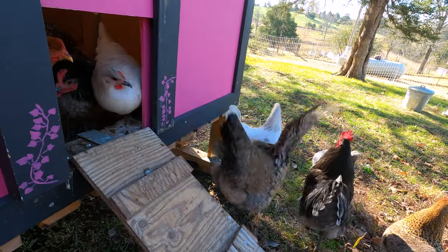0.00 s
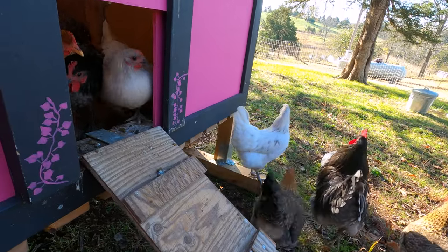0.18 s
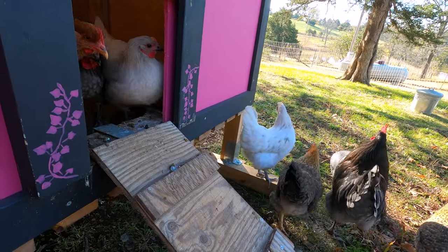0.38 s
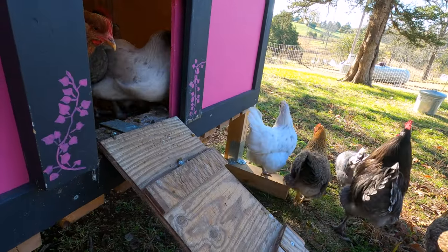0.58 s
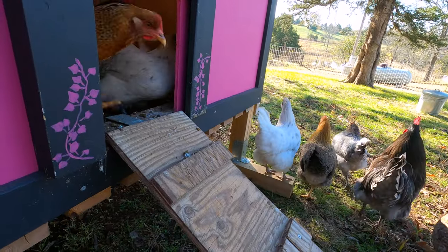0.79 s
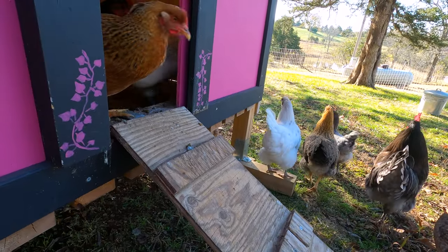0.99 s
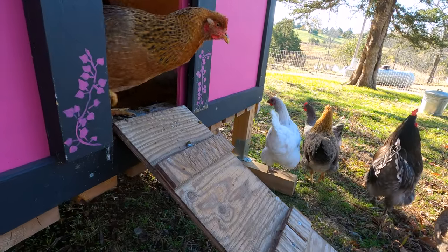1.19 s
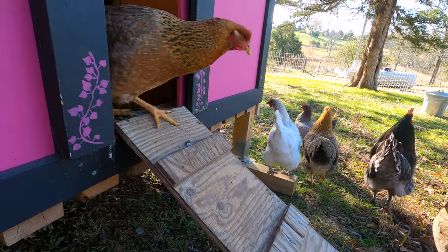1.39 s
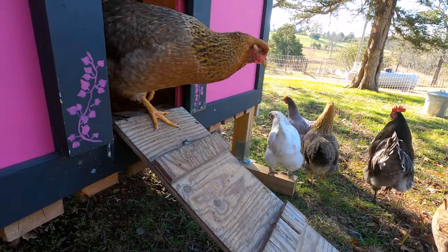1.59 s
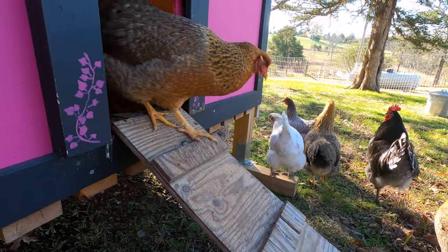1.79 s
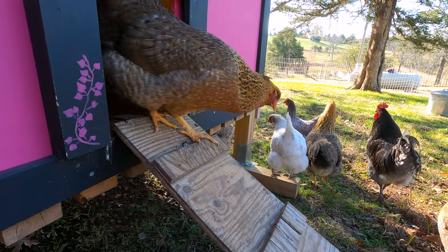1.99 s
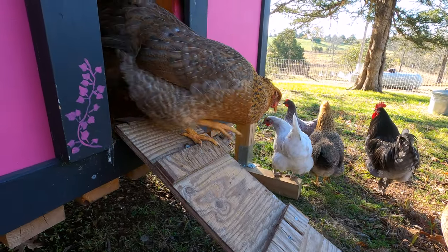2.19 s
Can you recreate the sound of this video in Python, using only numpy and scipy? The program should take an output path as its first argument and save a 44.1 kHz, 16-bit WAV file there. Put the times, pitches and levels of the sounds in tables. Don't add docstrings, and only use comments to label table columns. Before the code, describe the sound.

Chicken footsteps bump and scrape on hollow boards, with quiet clucks, ticking claws and rustling dry leaves

```python
import sys
import numpy as np
from scipy import signal
from scipy.fft import rfft, irfft
from scipy.io import wavfile
from scipy.ndimage import uniform_filter1d

SR = 44100
rng = np.random.default_rng(int(sys.argv[2]) if len(sys.argv) > 2 else 0)


def magnitude_from_level(level_db):
    exponent = np.asarray(level_db, float) / 20
    return 10 ** exponent


def file_out(sig):
    cols = np.atleast_2d(sig).T
    lim = np.clip(cols, -1, 1)
    pcm = np.round(lim * 32767).astype(np.int16)
    wavfile.write(sys.argv[1], SR, pcm)


N = 97020

# t/s, length/s, level/dB, pitch f/Hz, throat width/octaves
CLUCK_NOTES = [
    (0.203, 0.057, -38.5, 255.3, 0.68),
    (0.385, 0.025, -39, 286, 0.61),
    (0.4, 0.033, -49.5, 253, 0.24),
    (1.331, 0.011, -46, 235, 0.13),
    (1.347, 0.0155, -36.5, 242, 0.34),
    (1.581, 0.013, -51, 263, 0.14),
    (1.594, 0.014, -38, 198, 0.27),
]
# resonance f/Hz, share of pitch lost from start to end
CLUCK_THROATS = [(700, 0.067), (683, -0.032), (765, -0.052), (765, .045), (760, 0.052), (765, .045),
                 (757, 0.05)]


def clucks():
    attack_share, jitter, breathiness, pan_db = .25, .017, .13, -4.5
    out = np.zeros((2, N))
    for (s, length, db, hz, width), (throat, sag) in zip(CLUCK_NOTES, CLUCK_THROATS):
        u = np.arange(int(length * SR)) / (length * SR)
        wobble = uniform_filter1d(rng.standard_normal(4096), size=150)[:len(u)] * 12
        pitch = hz * (1 + sag * (.5 - u) + jitter * wobble)
        phase = 2 * np.pi * np.cumsum(pitch) / SR
        note = 0
        for k in range(1, 9):
            resonance_db = -6 * (np.log2(k * hz / throat) / width) ** 2
            note = note + magnitude_from_level(resonance_db) * np.sin(k * phase - 0.476 * k * k)
        note = rms_one(note) * (1 + breathiness * wobble)
        nearest_end = np.minimum(u, 1 - u)
        shape = np.sin(np.pi / 2 * np.clip(nearest_end / attack_share, 0, 1)) ** 2
        i = int(s * SR)
        out[:, i:i + len(u)] += panned(magnitude_from_level(db) * note * shape, pan_db)
    return out


# t/s, boom level/dB, boom centre f/Hz, litter drag level/dB
WEIGHT = [(0, -38.5, 108, -52), (.1, -51.5, 88, -70.5), (.23, -41.5, 111, -59), (.34, -51.5, 90, -68.5),
          (.41, -49, 135, -57.5), (.52, -39, 148, -52), (.57, -40, 131, -54.5), (.7, -36.5, 103, -44),
          (.84, -34, 80, -42), (.93, -24, 115, -41.5), (1.02, -30, 101, -57), (1.14, -32, 100, -45.5),
          (1.25, -31.5, 98.4, -53.5), (1.3, -35, 80, -56.5), (1.45, -33.5, 79, -62.5),
          (1.6, -38.5, 80, -65), (1.81, -46.5, 80, -69.5), (2.2, -45, 78.5, -66.5)]
# t/s, level/dB
FRAME_SWAY = [
    (0, -81),
    (.5, -47),
    (.7, -37.5),
    (.89, -30.5),
    (.97, -38),
    (1.4, -66),
    (1.6, -52),
    (2.2, -59),
]
CAVITY_MODES = [59.8, 80, 98.4, 125.7, 164.4, 202.1, 256.7]
# f/Hz, level per Hz/dB
DRAG_SPECTRUM = [(280, 9), (600, 4), (1300, -0.5), (2300, -31.5)]


def coop_floor():
    fall_db, q, top_hz = 8, 22, 313
    boom_db, centre, drag_db = in_time(WEIGHT)
    sway_db, = in_time(FRAME_SWAY)
    shares, modes = [], []
    for hz in CAVITY_MODES:
        shares.append(magnitude_from_level(-fall_db * np.abs(np.log2(hz / centre))))
        sharp = ring(rng.standard_normal(N), hz, q / hz)
        modes.append(evened(ring(sharp, hz, 5.0 / hz)))
    total_share = np.sqrt(np.sum(np.square(shares), axis=0))
    boom = evened(np.sum(np.multiply(shares, modes), axis=0) / total_share)
    side = magnitude_from_level(-23.5) * rms_one(ring(rng.standard_normal(N), 155, 0.0087)) * [[1], [-1]]
    low_pass = signal.butter(4, top_hz, fs=SR, output="sos")
    low = signal.sosfilt(low_pass, panned(boom, 1.27) + side)
    sway_band = signal.butter(2, [22, 45], "band", fs=SR, output="sos")
    sway = evened(signal.sosfilt(sway_band, rng.standard_normal(N)))
    drag = rms_one(banded(rng.standard_normal((2, 2, N)), DRAG_SPECTRUM, lambda hz: magnitude_from_level(1.2 * drift(14))))
    return magnitude_from_level(boom_db) * low + panned(magnitude_from_level(sway_db) * sway, 0.87) + magnitude_from_level(drag_db) * drag


FOOTFALL_TIMES = [.4, .49, .586, .679, .765, .855, .879, .895, 1.11, 1.345, 1.45, 1.765, 1.893]
# level/dB, pitch of the spot f/Hz
FOOTFALLS = [(-27.5, 138), (-51, 150), (-22, 390), (-22, 187), (-25.5, 157), (-25.5, 250), (-21, 140),
             (-32, 310), (-40, 400), (-32, 280), (-40.5, 330), (-45.5, 310), (-40.5, 227)]
# f/Hz, level/dB
BOARD_MODES = [(105, 2), (165, -0.5), (248, 0), (305, -11), (470, -6), (595, 1.5), (1085, 14), (1450, -17)]


def thuds():
    t60_s, loss_power, spot_fall_db = 0.097, 0.23, 15.5
    out, t = np.zeros(N), np.arange(N) / SR
    level_db, spot = np.transpose(FOOTFALLS)
    chance_db = rng.normal(0, 0.5, (len(FOOTFALLS), len(BOARD_MODES)))
    pushes = []
    for s, hz in zip(FOOTFALL_TIMES, spot):
        contact = np.clip((t - s) * hz / 0.42, 0, 1)
        pushes.append(np.sin(np.pi * contact) ** 2 * hz / SR * 5)
    pushes = np.array(pushes)
    for k, (hz, db) in enumerate(BOARD_MODES):
        off_spot_db = spot_fall_db * np.abs(np.log2(hz / spot))
        strength = magnitude_from_level(level_db + chance_db[:, k] + db - off_spot_db)
        out += ring(strength @ pushes, hz, t60_s * (500 / hz) ** loss_power)
    return panned(out, 1.7)


# f/Hz, level per Hz/dB
SCUFF_SPECTRUM = [(250, 6.5), (1100, 2.5), (2100, -0.5), (4100, -2.5), (9500, -24), (15500, -36)]
# t/s, rise/s, fall t60/s, level/dB, tilt/dB per octave
FOOT_SCUFFS = [(0.58, 0.0082, 0.13, -26.5, -0.5), (0.645, 0.012, 0.27, -32.5, 1),
               (0.668, 0.013, 0.071, -40.5, 8), (0.85, 0.005, 0.46, -35, -4),
               (0.9, 0.011, 0.054, -33, -1.5), (0.16, 0.041, 0.16, -48.5, 8.5),
               (0.37, 0.0072, 0.096, -41.5, 2.5), (1.443, 0.0078, 0.064, -45, 3),
               (1.616, .02, 0.27, -51.5, -2), (2.133, 0.0026, 0.17, -55.5, 1.5),
               (1.029, 0.013, 0.056, -46, 1.5), (1.149, 0.006, 0.024, -43, 0),
               (1.328, 0.0061, 0.11, -45.5, 1), (1.1, .03, .25, -47, -3), (.53, .004, 0.056, -45.5, -0.5),
               (.868, 0.011, .1, -47, 1.5)]


def scuffs():
    t = np.arange(N) / SR
    shapes = []
    for s, rise, t60, db, _ in FOOT_SCUFFS:
        swell = np.clip((t - s) / rise, 0, 1)
        decay = magnitude_from_level(-60 * np.clip(t - s - rise, 0, 2) / t60)
        shapes.append(magnitude_from_level(db) * swell * decay)
    tilts = np.array(FOOT_SCUFFS)[:, 4]

    def gain_at(hz):
        return magnitude_from_level(1.46 * drift(25)) * (magnitude_from_level(tilts * np.log2(hz / 2000)) @ shapes)

    source = grains(900)
    scale = np.std(banded(source[..., :SR // 4], SCUFF_SPECTRUM, lambda hz: 1))
    return banded(source, SCUFF_SPECTRUM, gain_at) / scale


# t/s, peak level/dB, ring f/Hz, tilt/dB per octave
CLAW_TICKS = [(.192, -30, 4500, 2.5), (0.309, -41, 7400, 12), (0.436, -44, 7200, 13),
              (0.475, -33, 7250, 7.5), (.533, -37, 2500, -6), (0.956, -31.5, 6120, 0.5),
              (1.218, -36.5, 4120, 5), (1.45, -34.5, 1980, -2), (1.458, -35, 2750, 0.5),
              (1.467, -46, 7100, 1), (1.518, -36, 1820, 1.5), (1.547, -42.5, 2480, 4),
              (1.616, -37, 1680, -18.5), (1.631, -43, 4260, 16), (1.679, -32.5, 1480, -2.9),
              (1.701, -40, 3830, 0), (1.72, -37.5, 1670, -6), (1.762, -41, 1940, 0.5),
              (1.889, -28.5, 3400, -2), (1.905, -30, 2210, 2.5), (.649, -35, 3000, 1.5),
              (1.251, -47, 4160, 6), (2.152, -47, 4730, -5), (.915, -34, 1330, -12),
              (1.019, -48.5, 3700, 2), (1.095, -43.5, 1930, 0), (1.128, -52, 7000, 8),
              (1.232, -39.5, 2052, 2), (1.308, -48, 3600, 6), (1.382, -48, 3900, 9),
              (1.403, -46.5, 7100, 8), (1.426, -44.5, 3860, 7), (1.275, -50, 7000, 7),
              (1.416, -50, 2900, 6), (1.856, -58, 9000, 16), (2.136, -46, 1800, -4)]
TICK_SIDES = [-1, 7, -4, 6, 5, 8, 1, 4, 5.5, 1.5, 1, 0, 0, 1.5, 1, 0, 0, 4, 4, 1.2, 4, -1, 5, 1, 4.5, 5,
              1.5, 3, 1.2, -1.5, -7, -2, -1, 1.5, 1.5, 7]


def ticks():
    crack_t60_s, ring_t60_s, cut_hz = .021, .022, 1350
    lumps_db, hump_db, ring_db, tick_db = 3, 6, -1, -5.5
    out, t = np.zeros((2, N + SR)), np.arange(4096) / SR
    hz_axis = np.maximum(np.arange(2049) * SR / 4096, 1)
    colour = magnitude_from_level(at_hz(SCUFF_SPECTRUM, hz_axis)) / np.sqrt(1 + (cut_hz / hz_axis) ** 6)
    for (s, db, hz, tilt), pan_db in zip(CLAW_TICKS, TICK_SIDES):
        white = rng.standard_normal((2, 4096))
        smooth = uniform_filter1d(uniform_filter1d(rng.standard_normal(2049), size=40), size=40)
        hump = hump_db * np.exp(-(2 * np.log2(hz_axis / hz)) ** 2)
        uneven_db = lumps_db * rms_one(smooth) + hump + tilt * np.log2(hz_axis / 2000)
        noise = rms_one(irfft(rfft(white) * colour * magnitude_from_level(uneven_db)))
        crack = (noise[0] + 0.47 * noise[1] * [[1], [-1]]) * magnitude_from_level(-60 * t / crack_t60_s)
        tone_db = ring_db - 60 * t / ring_t60_s * np.sqrt(hz / 2000)
        tone = np.sin(2 * np.pi * hz * t) * magnitude_from_level(tone_db)
        i = int(s * SR)
        out[:, i:i + 4096] += magnitude_from_level(db + tick_db) * panned(crack + tone, pan_db) * np.minimum(t / 0.0002, 1)
    return out[:, :N]


# t/s, length/s, level/dB, f/Hz
RUBBED_RINGS = [(.96, .09, -28, 59.5), (1.015, 0.087, -26, 63), (1.08, 0.15, -28.5, 64),
                (1.2, 0.089, -28, 61.8), (.915, 0.072, -26.5, 98), (.865, 0.07, -28.5, 158),
                (1.33, 0.063, -38, 260), (1.89, 0.042, -46.5, 240), (.582, 0.015, -31, 234),
                (.583, 0.015, -32.5, 606), (.48, 0.074, -39.5, 170), (1.43, .08, -35.5, 84.6),
                (.332, .035, -60, 580), (.652, 0.051, -40, 1100), (.668, 0.024, -44, 4050),
                (.905, 0.026, -37, 1350), (.85, 0.026, -40.5, 1150), (.855, 0.057, -37.5, 480),
                (1.951, .016, -58, 1150), (2.133, 0.047, -61, 1800), (2.133, .028, -59.5, 4700),
                (.493, 0.022, -53, 1250), (1.612, .025, -56, 1650), (1.448, 0.015, -46, 2100),
                (1.44, 0.028, -53.5, 510), (1.755, 0.026, -58, 506)]


def rings():
    wander_share, rise_share = .025, .35
    out = np.zeros(N)
    for s, length, db, hz in RUBBED_RINGS:
        u = np.arange(int(length * SR)) / (length * SR)
        wander = rms_one(uniform_filter1d(rng.standard_normal(8192), size=int(3 * SR / hz)))[:len(u)]
        rise_and_fall = np.minimum(u / rise_share, (1 - u) / (1 - rise_share))
        shape = np.sin(np.pi / 2 * rise_and_fall) ** 1.5
        phase = 2 * np.pi * np.cumsum(hz * (1 + wander_share * wander)) / SR
        i = int(s * SR)
        out[i:i + len(u)] += magnitude_from_level(db + 5.5) * shape * np.sin(phase)
    return panned(out, 1.7)


# t/s, level/dB
LEAF_RUSTLE = [(0, -53), (.15, -50), (.3, -52.5), (.5, -51), (.75, -49), (.93, -49), (.99, -61.5),
               (1.12, -59), (1.25, -54.5), (1.4, -58.5), (1.6, -57.5), (1.85, -65.5), (2.05, -59.5),
               (2.2, -59.5)]
# f/Hz, level per Hz/dB
LEAF_SPECTRUM = [(300, -13), (780, -17), (1150, -2.5), (1700, -2.5), (4200, -4.5), (9600, -20),
                 (15500, -27.5)]


def leaves():
    db, = in_time(LEAF_RUSTLE)
    shared = drift(5.5)
    rustle = banded(grains(220), LEAF_SPECTRUM, lambda hz: magnitude_from_level(shared + 1.96 * drift(21.0)))
    return magnitude_from_level(db) * rms_one(rustle)


# delay t/s, level/dB
REFLECTIONS = [
    (.007, -23.5),
    (.013, -18.5),
]


def echoes(x):
    dull = signal.lfilter([.4], [1, -.6], x[::-1])
    out = 0
    for s, db in REFLECTIONS:
        out = out + magnitude_from_level(db) * np.pad(dull, ((0, 0), (int(s * SR), 0)))[:, :N]
    return out


def grains(per_s):
    sizes = magnitude_from_level(3.5 * np.minimum(rng.exponential(1, N), 2.5)) * (rng.random(N) < per_s / SR)
    crackle = signal.lfilter([1], [1, -.97], sizes)
    return rng.standard_normal((2, 2, N)) * (1 + magnitude_from_level(-8) * rms_one(crackle))


# f/Hz, correlation
CHANNEL_LIKENESS = [(60, 0.99), (240, 0.98), (950, 0.74), (2000, 0.45), (4500, 0.21), (15000, 0.054)]
# f/Hz, left-right level/dB
CHANNEL_LEAN = [(100, 3.5), (700, 1.5), (2000, 5.5), (4000, 2.5), (12000, -2.5)]


def banded(source, spectrum, gain_at):
    out, edges = 0, spectrum[0][0] * 2 ** np.arange(0, 6.1, .5)
    edges = edges[edges < 20000]
    for k, (low, high) in enumerate(zip(edges, edges[1:])):
        band = signal.butter(2, [low, high], "band", fs=SR, output="sos")
        mid, side = signal.sosfilt(band, source[k % 2])
        hz = np.sqrt(low * high)
        alike = np.clip(at_hz(CHANNEL_LIKENESS, hz), 0, 1)
        both = np.sqrt(1 + alike) * mid + np.sqrt(1 - alike) * side * [[1], [-1]]
        out = out + magnitude_from_level(at_hz(spectrum, hz)) * gain_at(hz) * panned(both, at_hz(CHANNEL_LEAN, hz))
    return out


def ring(x, hz, t60):
    r, w = magnitude_from_level(-60 / (t60 * SR)), 2 * np.pi * hz / SR
    return signal.lfilter([0, np.sin(w)], [1, -2 * r * np.cos(w), r * r], x + 1e-18)


def drift(rate):
    r = np.exp(-2 * np.pi * rate * 40 / SR)
    slow = signal.lfilter([1], [1, -2 * r, r * r], rng.standard_normal(N // 40 + 2002))[2000:]
    return np.interp(np.arange(N) / 40, np.arange(len(slow)), rms_one(slow))


def evened(x):
    x = rms_one(x)
    power = uniform_filter1d(x ** 2, size=int(.09 * SR))
    return x / (power + 0.008) ** (.6 / 2)


def panned(x, db):
    return x * magnitude_from_level(np.array([[db / 2], [-db / 2]]))


def rms_one(x):
    return x / np.sqrt(np.mean(x ** 2) + 1e-20)


def in_time(rows):
    s, *columns = np.transpose(rows)
    return [np.interp(np.arange(N) / SR, s, c) for c in columns]


def at_hz(points, hz):
    points_hz, values = np.transpose(points)
    return np.interp(np.log(hz), np.log(points_hz), values)


def scene():
    near = clucks() + thuds() + rings() + ticks()
    ground = coop_floor() + scuffs() + leaves()
    return near + echoes(near) + ground


def band_limit(x):
    return signal.sosfilt(signal.butter(12, 15700, fs=SR, output="sos"), x)


# f/Hz, added share
PORT_PEAKS = [
    (4100, 0.3),
    (7000, 0.84),
]


def record(dry):
    q, top_hz, limit = 7.6, 11150, 0.32
    x = dry
    for hz, share in PORT_PEAKS:
        x = x + share * signal.lfilter(*signal.iirpeak(hz, q, fs=SR), dry)
    rounded = limit * np.tanh(x / limit)
    dulled = signal.sosfilt(signal.butter(2, top_hz, fs=SR, output="sos"), rounded)
    mix = signal.sosfilt(signal.ellip(10, .5, 70, 15600, fs=SR, output="sos"), dulled)
    return band_limit(mix)


dry = scene()
out = record(dry)
file_out(out)
```